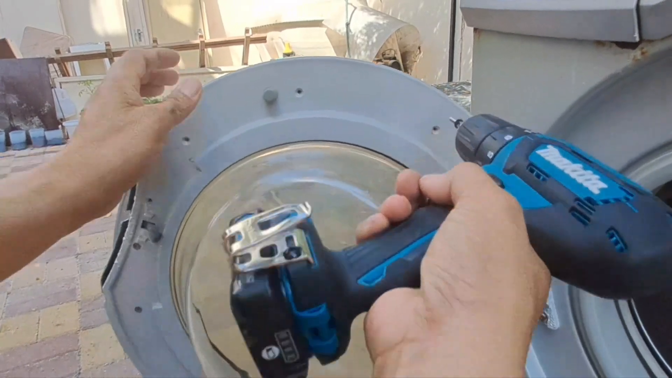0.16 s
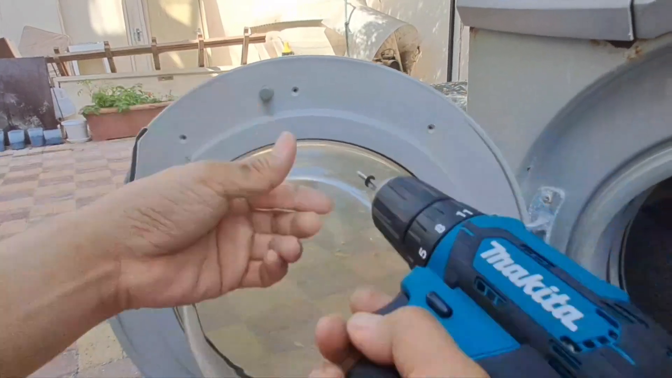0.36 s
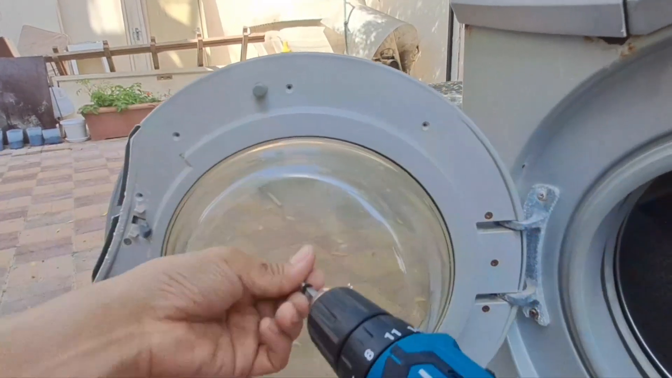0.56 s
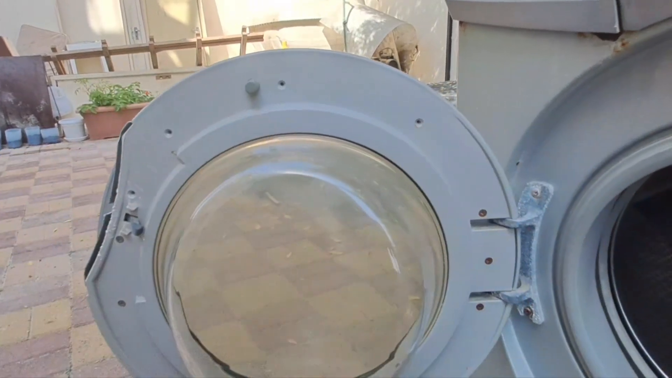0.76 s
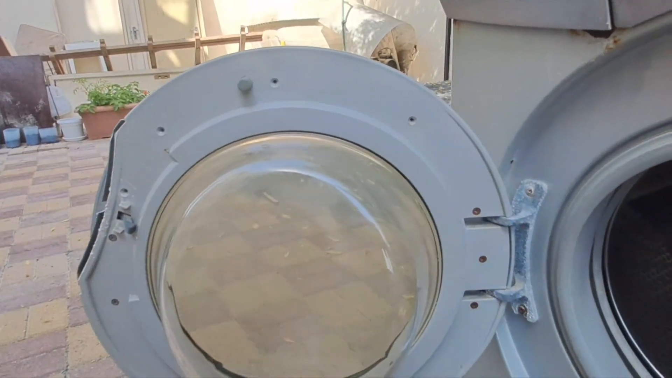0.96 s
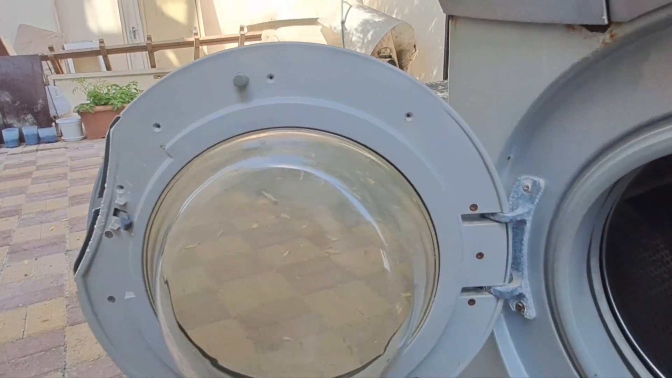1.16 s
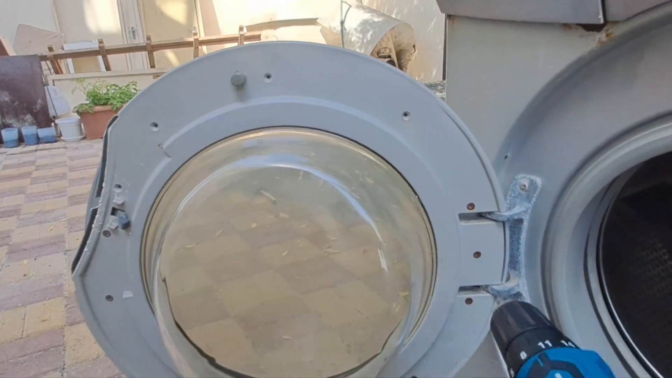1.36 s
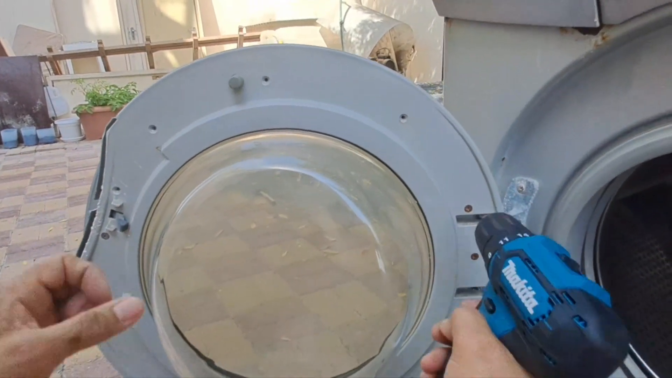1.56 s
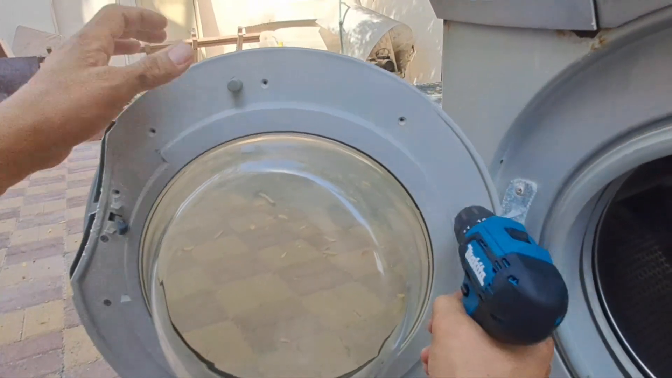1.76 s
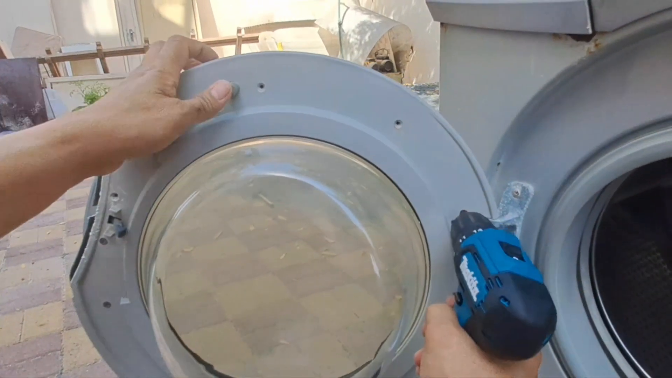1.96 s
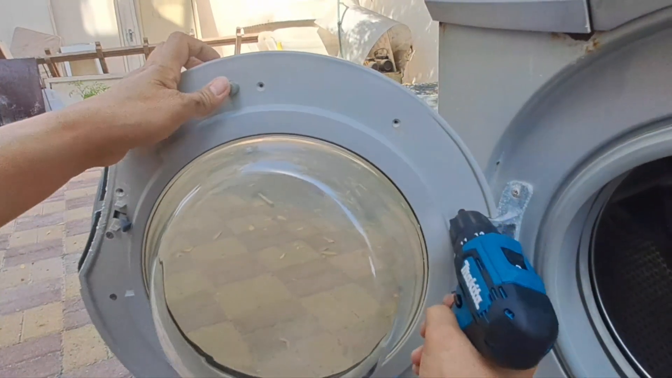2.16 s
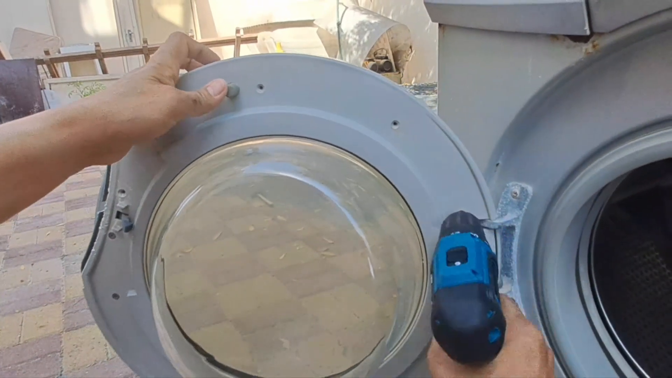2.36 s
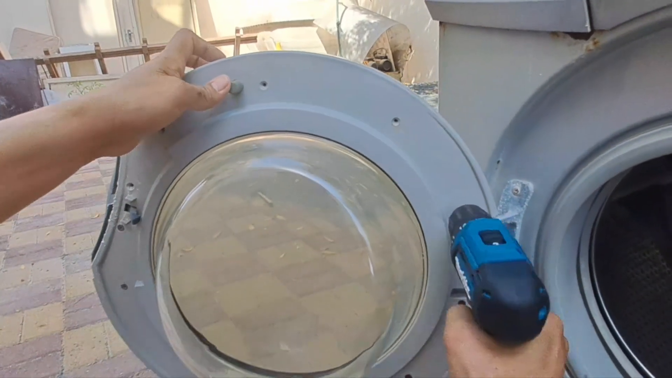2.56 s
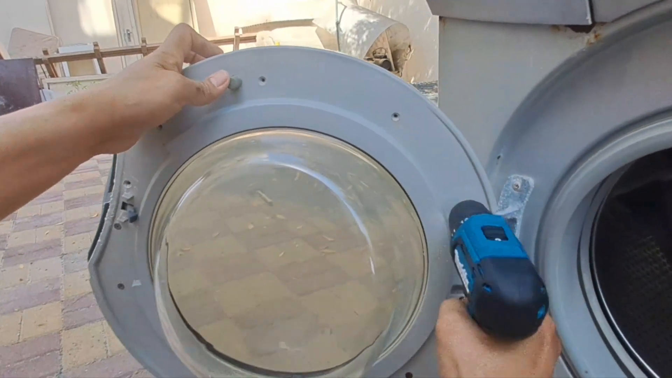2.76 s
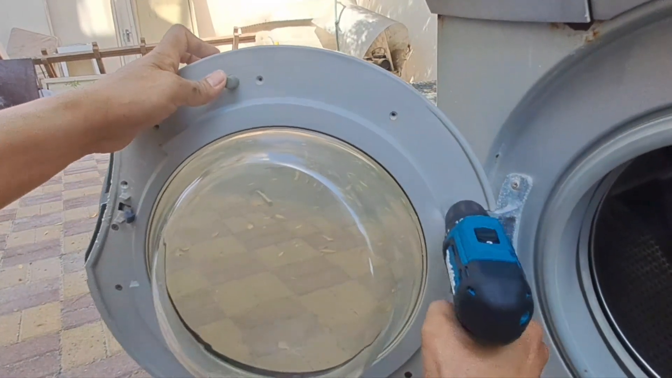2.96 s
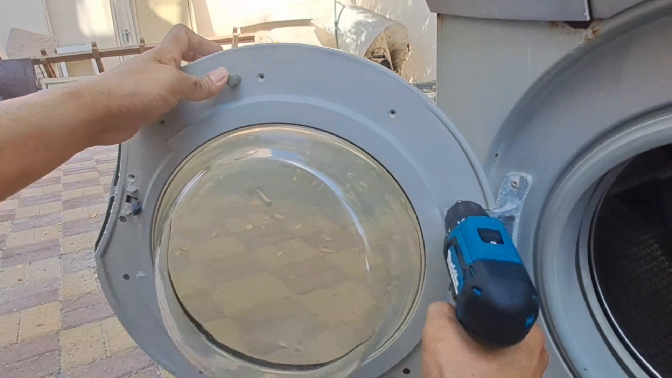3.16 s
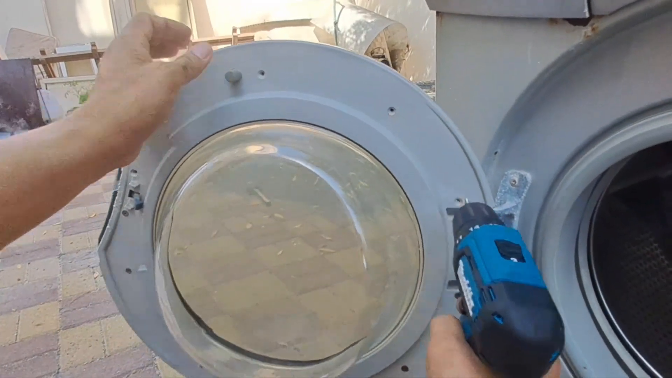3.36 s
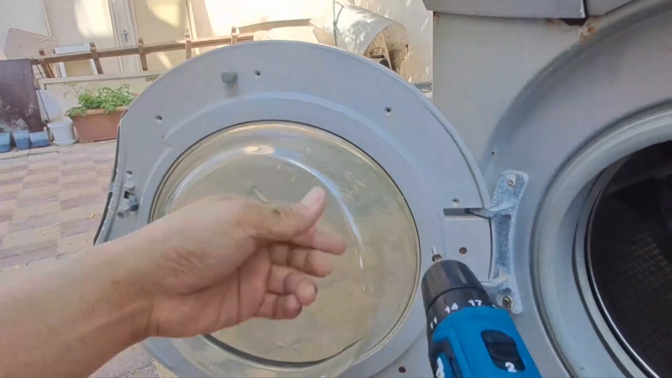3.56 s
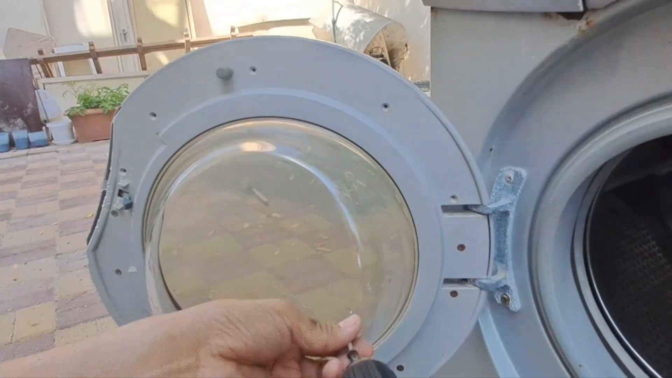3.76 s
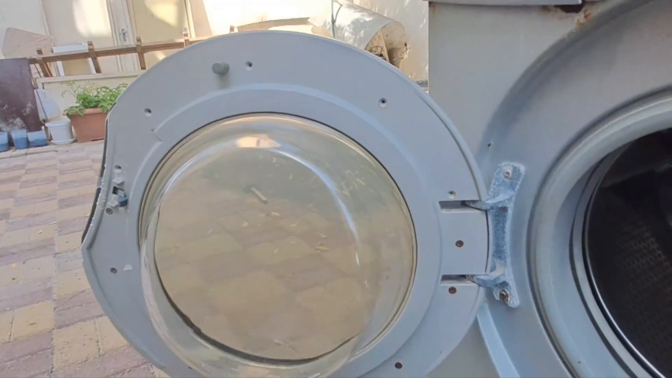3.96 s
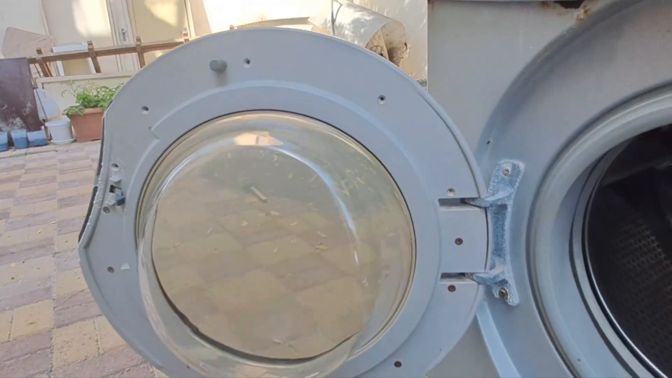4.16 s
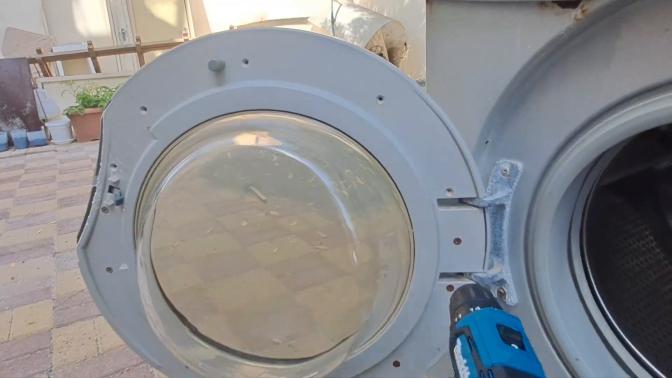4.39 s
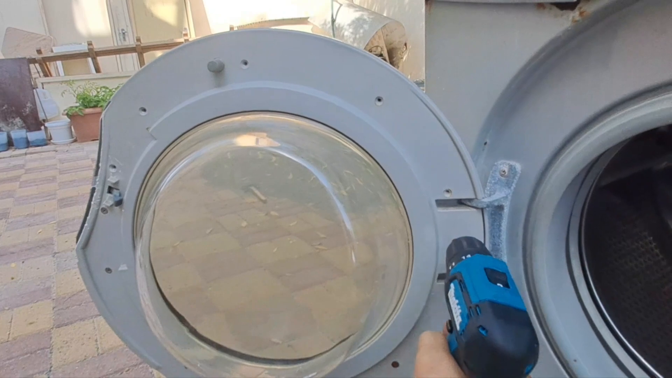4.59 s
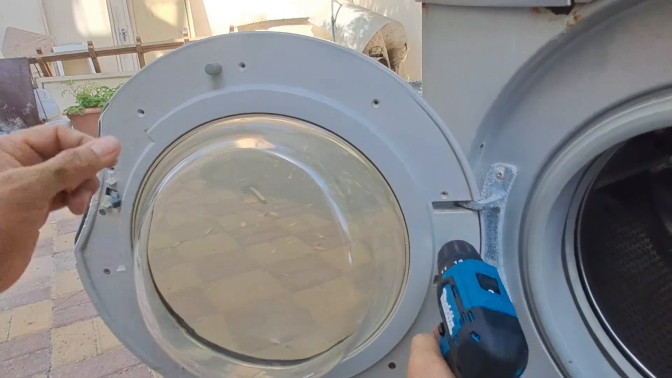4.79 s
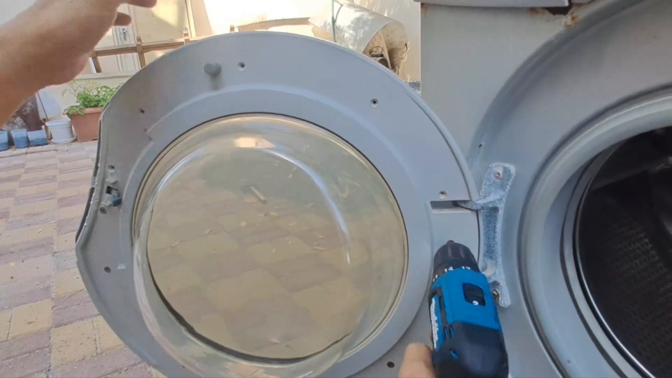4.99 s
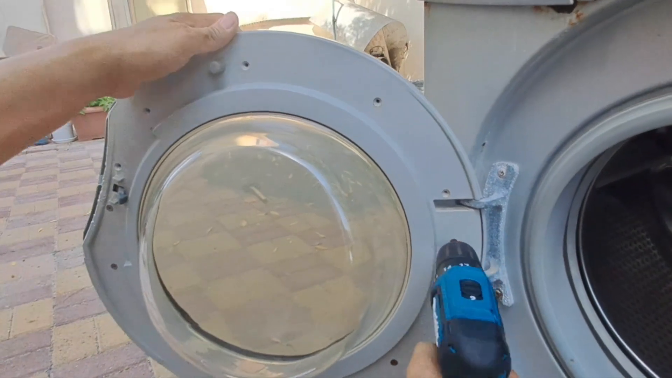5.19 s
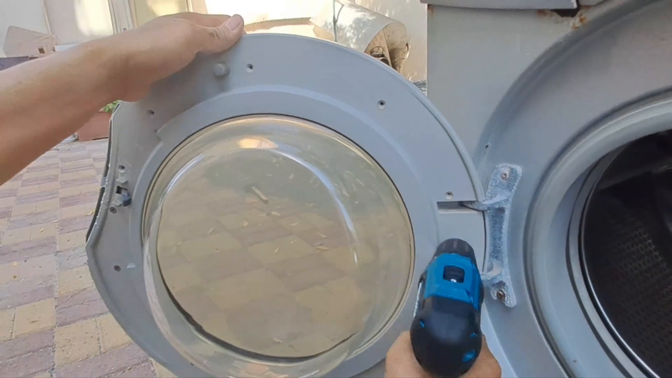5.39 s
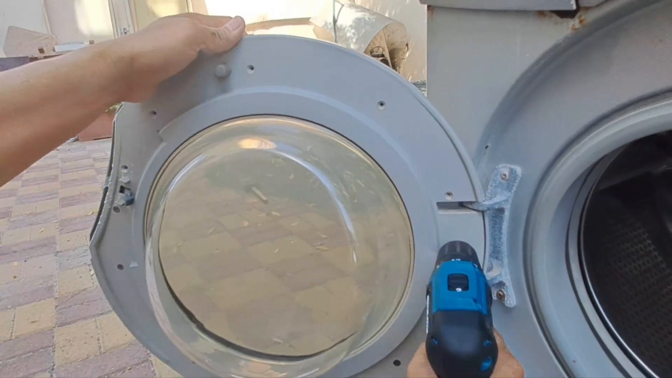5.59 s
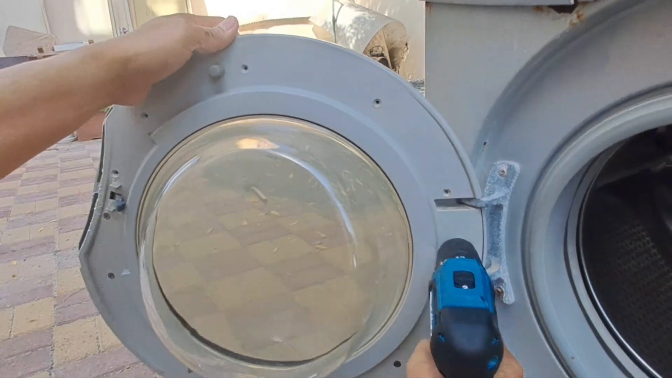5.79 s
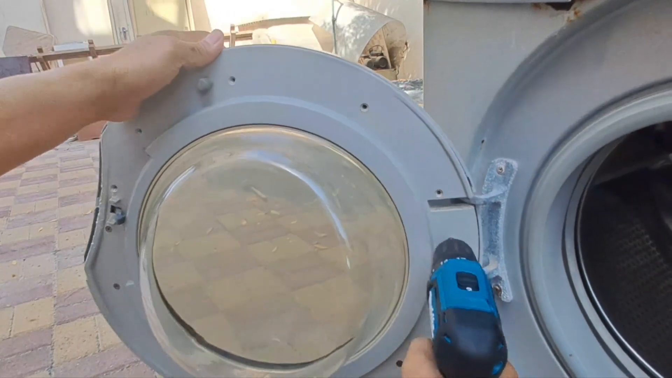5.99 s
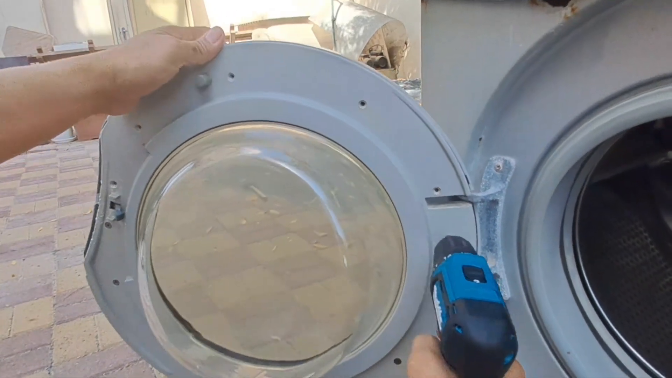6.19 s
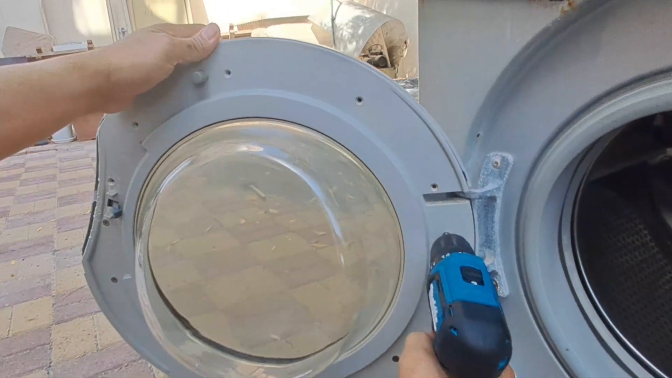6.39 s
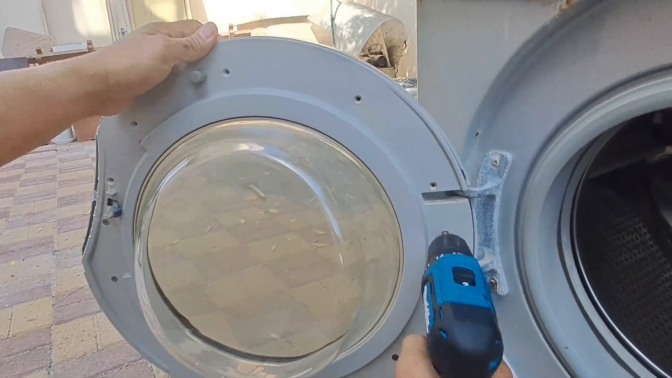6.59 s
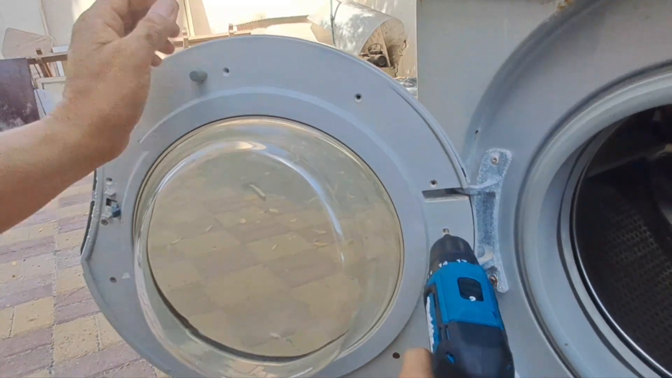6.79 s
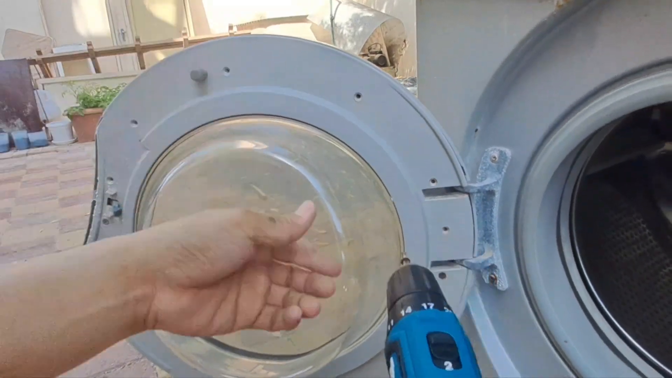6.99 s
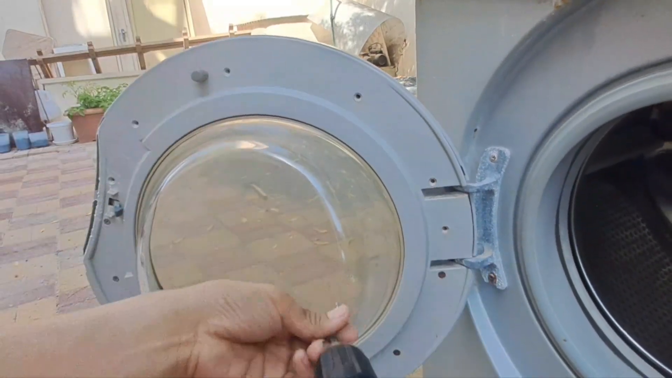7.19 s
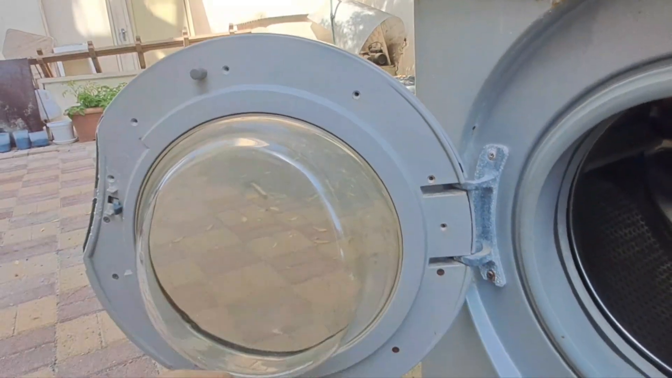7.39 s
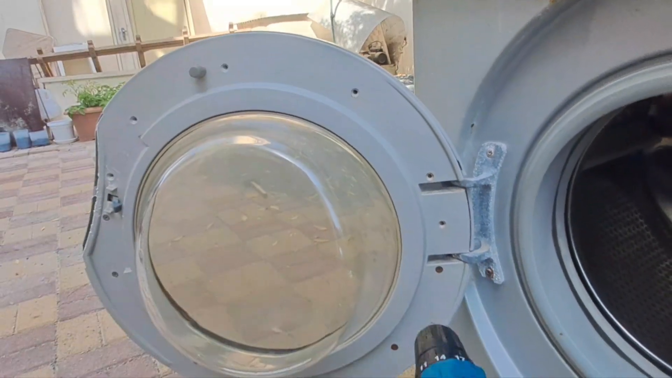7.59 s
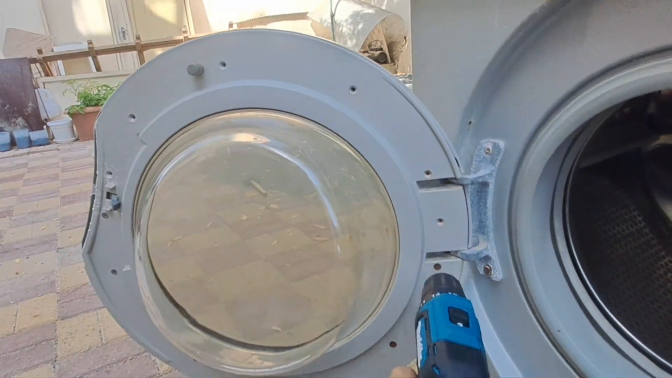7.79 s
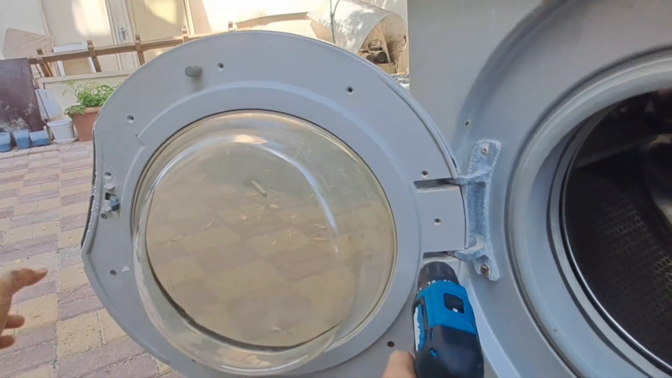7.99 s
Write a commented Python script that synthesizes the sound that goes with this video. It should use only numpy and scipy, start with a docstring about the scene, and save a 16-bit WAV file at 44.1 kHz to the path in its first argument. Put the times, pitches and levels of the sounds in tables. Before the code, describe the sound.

Short power drill pulls buzz and snap to a stop close by, between door knocks, small clicks and bird chirps in a paved yard.

```python
"""A drill's rasp ends at once in a brake clack over town rumble, street wash and high hiss.
A cordless drill whines and rasps in short pulls, with knocks and birdsong between, as it backs screws out of a
plastic appliance door in a paved yard, close to a chest-worn camera. The motor is rotor-order sines over throbbing
noise; trigger and brake clacks are short noise bursts; knocks ring decaying modes and scrape; small contacts tick.
A songbird calls in gliding sines between the walls, and a far whine falls in pitch."""
import sys
import numpy as np
from scipy import signal
from scipy.fft import rfft, irfft, next_fast_len
from scipy.io import wavfile
from scipy.ndimage import uniform_filter1d, map_coordinates

SR = 44100
rng = np.random.default_rng(int(sys.argv[2]) if len(sys.argv) > 2 else 0)


def waveform_to_disk(signal):
    """Save audio, clipped to [-1, 1], as 16-bit WAV at the path in sys.argv[1]."""
    frames = np.transpose(np.atleast_2d(signal))
    scaled = np.clip(frames, -1, 1) * 32767
    samples = np.round(scaled).astype(np.int16)
    wavfile.write(sys.argv[1], SR, samples)


N = 355005


def amp(db):
    """Gain of a level in dB."""
    return 10 ** (np.asarray(db) / 20)


def unit(x):
    """x at rms 1."""
    return x / np.sqrt(np.mean(x ** 2) + 1e-20)


def along(points, hz):
    """Reads a curve of (frequency, value) points on a log frequency axis."""
    f, v = np.transpose(points)
    return np.interp(np.log(hz + 1), np.log(f + 1), v)


def played(tables, edge):
    """One value per sample for each column, then a gate that is open while a table lasts."""
    t = np.arange(N) / SR
    s, *cols = np.transpose(np.concatenate(tables))
    gate = sum((t >= rows[0][0]) & (t < rows[-1][0]) for rows in tables)
    soft_gate = uniform_filter1d(1. * gate, int(edge * SR) + 1)
    return [np.interp(t, s, c) for c in cols] + [soft_gate]


def wobble(rate):
    """A smooth random curve, rate knots a second."""
    knots = rng.standard_normal(int(N * rate / SR) + 4)
    return map_coordinates(knots, [np.arange(N) * rate / SR])


def filtered(x, response):
    """x times a complex response of frequency."""
    m = next_fast_len(N + SR // 2)
    return irfft(rfft(x, m) * response(np.fft.rfftfreq(m, 1 / SR)), m)[..., :N]


def band(x, low_hz, high_hz):
    """Causal band-pass."""
    edges = np.clip([low_hz, high_hz], 20, .49 * SR)
    return signal.sosfilt(signal.butter(2, edges, "bandpass", fs=SR, output="sos"), x)


def sides(lean_db):
    """Left and right gains of a level difference."""
    return amp(np.array([lean_db / 2, -lean_db / 2]))


def add(track, s, sound):
    """Mixes a sound into the track at s seconds."""
    part = track[:, round(s * SR):][:, :sound.shape[1]]
    part += sound[:, :part.shape[1]]


def rush(spectrum, alike, patchy_db):
    """Stereo noise whose middle has rms 1, with patches of random gain in time and frequency."""
    z = signal.stft(rng.standard_normal((2, N)), nperseg=256)[2]
    field = uniform_filter1d(rng.standard_normal(z.shape[1:]), 2, 0)
    field = uniform_filter1d(field, 24, 1)
    pair = signal.istft(z * amp(patchy_db * unit(field)), nperseg=256)[1][:, :N]

    def mid_side(hz):
        # half the angle whose cosine is the left-right likeness
        turn = np.arccos(np.clip(along(alike, hz), -1, 1)) / 2
        return amp(along(spectrum, hz)) * [np.cos(turn), np.sin(turn)]

    mid, side = filtered(pair, mid_side)
    return np.array([mid + side, mid - side]) / np.std(mid)


# decay of the yard echo: (frequency [Hz], t60 [s])
YARD_DECAY = [(300, 0.66), (2500, 0.32), (10000, 0.31)]
ECHOES_DB = 3.5  # unevenness of the slaps off the walls


def yard(x):
    """The walls' answer: uneven slaps, each frequency dying at its own speed."""
    hz, t, z = signal.stft(rng.standard_normal((2, SR * 3 // 4)), SR, nperseg=256)
    slaps_db = ECHOES_DB * wobble(40)[(t * SR).astype(int)]
    decay_db = -60 * t / along(YARD_DECAY, hz)[:, None]
    tail = signal.istft(z * amp(slaps_db + decay_db), SR, nperseg=256)[1]
    late = np.pad(x.mean(0), (400, 0))[None]  # the walls answer 400 samples late
    return signal.fftconvolve(late, tail / np.linalg.norm(tail[0]), axes=1)[:, :N]


# town levels: (time [s], rumble level [dB], street level [dB])
TOWN_LEVELS = [(0, -42, -60), (1.1, -41.5, -59), (2.3, -35.5, -53), (3.5, -42, -57.5), (4.5, -41, -59),
               (5.5, -36, -52.5), (6.35, -43, -61.5), (8.05, -38.5, -57)]
# high hiss: (time [s], level [dB])
HISS_LEVEL = [(0, -65.5), (2.85, -62), (3.45, -81), (7.85, -81), (7.92, -63)]
# noise colours: (frequency [Hz], relative level per Hz [dB])
RUMBLE = [(25, -27.5), (50, 0), (90, 1), (118, -9), (146, -1), (170, -8.5), (400, -29), (600, -67)]
STREET = [(150, -21), (220, -11.5), (500, -13), (2500, -25.5), (3600, -29.5), (5200, -28.5), (7300, -37),
          (16000, -50)]
HISS = [(3200, -10), (4800, 7), (6000, -1), (8600, -26), (9600, -2), (11300, 1), (12500, -7),
        (16000, -31.5)]
# stereo width of the background: (frequency [Hz], left-right likeness [0-1])
FAR_LIKENESS = [(300, 1), (1000, 0.031), (10000, 0.036)]


def background():
    """Lumpy low rumble, street wash and a high hiss that comes and goes, reaching the left port first."""
    rumble_db, street_db, _ = played([TOWN_LEVELS], edge=.01)
    hiss_db = played([HISS_LEVEL], edge=.01)[0]
    rumble = amp(rumble_db + 1.5 * wobble(5)) * rush(RUMBLE, FAR_LIKENESS, patchy_db=1.2)
    street = amp(street_db) * rush(STREET, FAR_LIKENESS, patchy_db=2)
    hiss = amp(hiss_db) * rush(HISS, FAR_LIKENESS, patchy_db=.8)
    left, right = rumble + street + hiss
    return np.array([left, np.roll(right, 12)])  # delay in samples


# distant tone: (time [s], pitch [Hz], relative level [dB], blur [0-1])
FAR_WHINE = [(3.3, 1830, -61.5, 0.23), (3.75, 1762, -51.5, 1), (3.95, 1576, -59.5, 0.45),
             (4.5, 1434, -54.5, 0.03), (5.1, 1382, -56, 0.77)]


def far_whine():
    """A distant tone with a weak lower octave, its pitch blurred by the air, heard off the walls."""
    hz, db, blur, on = played([FAR_WHINE], edge=0.288)
    blurred_hz = hz * (1 + 0.0354 * blur * wobble(130))
    phase = 2 * np.pi * np.cumsum(blurred_hz) / SR
    octaves = np.sin(phase) + amp(-10.0) * np.sin(phase / 2)
    tone = on * amp(db + 2.5 * wobble(20)) * octaves
    return yard(tone[None])


NOTE_ATTACK_S, NOTE_FADE_DB_PER_S = .004, 100  # the attack time also shapes the end of a note


def whistle(notes, rough):
    """Each note slides from its first pitch to a settled one and fades; the pitch is slightly unsteady."""
    out, t = np.zeros((1, N)), np.arange(SR // 8) / SR
    unsteady = 1 + rough * wobble(200)
    for s, length, first_hz, settled_hz, glide, db in notes:
        slide_hz = settled_hz + (first_hz - settled_hz) * np.exp(-t / glide)
        hz = slide_hz * unsteady[round(s * SR):][:len(t)]
        phase = 2 * np.pi * np.cumsum(hz) / SR
        edges = np.clip(np.minimum(t, length - t) / NOTE_ATTACK_S, 0, 1)
        shape = edges * amp(db - NOTE_FADE_DB_PER_S * t)
        add(out, s, (shape * np.sin(phase))[None])
    return out


# notes of the near singer, then of farther birds:
# (time [s], length [s], first pitch [Hz], settled pitch [Hz], glide [s], relative level [dB])
SONG = [(4.693, .02, 2760, 2640, .006, -38), (4.712, .062, 2700, 3160, .008, -28),
        (4.899, .046, 2640, 2595, .02, -20), (4.976, .055, 3250, 2995, .004, -24),
        (5.046, .044, 3020, 2630, .007, -20), (5.148, .022, 2886, 2790, .01, -20),
        (5.166, .05, 2850, 2130, .014, -19), (5.256, .05, 3120, 2378, .004, -20)]
FAR_SONG = [(3.545, 0.021, 6940, 4460, 0.019, -56), (3.587, 0.019, 4640, 6000, 0.0136, -55),
            (7.41, 0.047, 2600, 2490, 0.0095, -66), (7.555, 0.065, 2780, 2744, .01, -60),
            (7.7, 0.05, 2520, 2324, 0.0034, -56.5), (7.826, 0.12, 2900, 2730, 0.01, -61)]


def birds():
    """The singer comes direct and off the walls, the far birds mostly off the walls; a faint hiss at
    9.5-13.5 kHz follows the singer's notes."""
    near, far = whistle(SONG, rough=.01), whistle(FAR_SONG, rough=.006)
    note_hiss = band(np.abs(near) * rng.standard_normal(N), low_hz=9500, high_hz=13500)
    note_hiss = amp(-22) * note_hiss
    near = near * (1 + .25 * wobble(500))  # husky
    direct = amp(2.5 * wobble(70)) * near
    echo = yard(amp(-3.5) * near + note_hiss + 2 * far)
    return direct + echo + note_hiss + far / 2


# small handling contacts: (time [s], relative peak level [dB], centre [Hz])
TICKS = [(1.0173, -41.5, 5050), (1.5076, -32, 11100), (2.461, -35, 3500), (2.483, -33.5, 4970),
         (2.806, -36.5, 8900), (2.867, -22.5, 11020), (4.108, -42, 2210), (4.1298, -38, 5240),
         (4.6256, -35, 8000), (5.1509, -23, 4640), (5.2, -32.5, 5400), (5.396, -47, 10900),
         (5.641, -44, 7000), (5.7579, -43, 8890), (5.7845, -37, 12000), (7.892, -38, 11000),
         (8.016, -43.5, 12000)]


def ticks():
    """Hard little contacts of bit, screw and fingers: band-passed noise with a fast and a faint slower decay."""
    out, t = np.zeros((2, N)), np.arange(SR // 30) / SR
    for s, db, centre_hz in TICKS:
        decay = amp(-60 * t / 0.027) + 0.032 * amp(-60 * t / 0.098)
        snap = decay * rng.standard_normal((2, len(t)))
        snap = band(snap, centre_hz * 0.25, centre_hz * 1.22)
        add(out, s, amp(db + 5.0) * snap / np.abs(snap).max())
    return out


def ring(modes, scale, rise, t):
    """Decaying sines of a struck body, each mode at a slightly new strength per blow."""
    total = 0
    for hz, db, t60 in modes:
        level_db = db + rng.normal(0, 1.2) - 60 * t / t60
        total = total + amp(level_db) * np.sin(2 * np.pi * hz * scale * t)
    return (1 - np.exp(-t / rise)) * total


# the bit hits the door: (time [s], relative level [dB], boom over that level [dB], rim pitch at that spot [Hz])
KNOCKS = [(2.015, -17, -3.5, 463), (2.162, -25, -6, 500), (2.19, -24, -4.5, 500), (2.469, -25.5, 5, 511),
          (4.824, -31.5, 10, 685), (4.882, -28, 1, 466), (5.149, -16, 3.5, 669), (5.825, -31, -28, 612),
          (5.993, -11, -10.5, 484), (6.644, -38.5, 1, 576), (7.005, -39, -15.5, 585)]
# plastic rim modes: (multiple of the spot's pitch, relative level [dB], t60 [s])
RIM = [(1, 5, 0.03), (1.5, -6, 0.03)]
# glass bowl modes: (frequency [Hz], relative level [dB], t60 [s])
BOWL = [(88.7, -2, 0.28), (144, -7.5, 0.15), (180, -4, 0.13)]


def knocks():
    """Each blow rings the plastic rim and glass bowl; the bit scrapes on, with a louder tail the more it booms."""
    out, t = np.zeros((2, N)), np.arange(SR // 4) / SR
    uneven = wobble(60)
    for s, db, boom_db, spot_hz in KNOCKS:
        rattle = rng.standard_normal(len(t)) + .5 * rng.standard_normal((2, len(t)))
        tail_db = boom_db / 2 - 7.5 - 60 * t / 0.2 + 1.6 * uneven[round(s * SR):][:len(t)]
        grip = (1 - np.exp(-t / 0.0057)) * (amp(-60 * t / 0.038) + amp(tail_db))
        scrape = band(grip * rattle, spot_hz * 0.25, spot_hz * 1.29)
        scrape = band(scrape, low_hz=199, high_hz=2570)
        scrape = scrape + amp(-30.5) * band(grip * rattle, low_hz=1030, high_hz=6000)
        rim = ring(RIM, spot_hz, 0.0019, t) * sides(6.2)[:, None]
        bowl = ring(BOWL, 1, 0.015, t)
        add(out, s, amp(db) * (amp(3.5) * rim + amp(boom_db + 4) * bowl + amp(15.5) * scrape))
    return out


# drill shell resonances: (frequency [Hz], width [Hz], relative level [dB])
HOUSING = [(3730, 420, -5), (5685, 480, -5), (7560, 230, -8.5), (10170, 370, -14)]


def shell(hz):
    """The drill housing passes everything and lifts its resonances."""
    return 1.034 + sum(amp(db) * 1j * hz * w / (c * c - hz * hz + 1j * hz * w) for c, w, db in HOUSING)


# the spindle brake ends each pull: (time [s], relative level [dB], part under 2 kHz over that level [dB],
# length scale [s], gap to its second clack [s])
BRAKES = [(0.0147, 0, -12, 0.014, 0.024), (3.289, -1, -14.5, 0.017, 0.023), (6.1976, 0, -12, 0.013, .021),
          (7.0223, -20, -9, 0.015, 0.019)]
BITE_S = .005  # from pull to the clack of the gears taking up
TRIGGER_LOW_DB, TRIGGER_S = -26.5, .006  # trigger clack: part under 2 kHz over its level, length scale
REBOUND_DB = -5  # the brake's second clack over its first


def clacks():
    """A few milliseconds of rattling contact; its upper part rings the drill shell."""
    high, low = np.zeros((2, N)), np.zeros((2, N))
    t = np.arange(SR // 20) / SR
    triggers = [(pull[0] + BITE_S, pull[-1], TRIGGER_LOW_DB, TRIGGER_S) for pull in PULLS if pull[0] > 0]
    rebounds = [(s + gap, db + REBOUND_DB, low_db, length / 2) for s, db, low_db, length, gap in BRAKES]
    for s, db, low_db, length, *_ in triggers + BRAKES + rebounds:
        fall = np.exp(-(t / np.clip(length * 0.59, .001, .03)) ** 2)
        shape = (1 - np.exp(-t / 0.0009)) * fall
        add(high, s, amp(db - 10.0) * shape * rng.standard_normal((2, len(t))))
        rattle = rng.standard_normal(len(t)) + 2.3 * rng.standard_normal((2, len(t)))
        add(low, s, amp(db + low_db + 0.5) * shape * rattle)
    ringing = band(filtered(high, shell), low_hz=3000, high_hz=13000)
    return ringing + band(low, low_hz=940, high_hz=1900)


# trigger pulls: (pulled [s], released [s], whine pitch approached [Hz], spin-up [s], coast [Hz per s],
# gear tone over rasp [dB], relative rasp level [dB], relative door drumming level [dB],
# tightness of the screw [0-1], first lurch over drumming [dB], relative trigger clack level [dB])
PULLS = [(-.4, -0.127, 4500, 0.082, 15600, -19, -29, -30.5, 0.04, -9.5, -40),
         (2.869, 3.205, 4518, 0.049, 6870, -30, -28, -38.5, 0.65, 14.5, -13.5),
         (5.83, 6.13, 4463, 0.059, 11700, -42.5, -30, -35.5, 0.55, -13, 0.5),
         (6.482, 6.632, 2890, 0.065, 3852, -1, -37.5, -53, 0, 8.5, -45)]
WHINE_DB, RASP_GROWS = 6, 0.82  # whine setting over rasp; power of the speed that the gains follow
FREES_S, LURCH_S = .15, .06  # a tight screw lets go; at first it lurches and drums the door harder
DRAG_DB_PER_S = 90  # extra fade of the tones when coasting in a fully tight screw
BRAKED_DB, RUNDOWN_DB_PER_S = -5, 520  # gear noise under the brake; its fade after the second clack
SETTLES = .15  # share of the spin-up over which the tones appear, later for a tighter screw


def speed():
    """Whine pitch and four gains: the rotor nears top speed, coasts down evenly, and the brake ends its tones."""
    t = np.arange(N) / SR
    out = np.zeros((5, N))
    for pull, (braked, *_, gap) in zip(PULLS, BRAKES):
        pulled, released, top_hz, spin_up, coast, gear_db, rasp_db, drum_db, tight, lurch_db, _ = pull
        now = t >= pulled
        u = t[now]
        since = u - pulled
        coasting = np.maximum(u - released, 0)
        rise = 1 - np.exp(-(np.minimum(u, released) - pulled) / spin_up)
        slowed_hz = coast * np.maximum(np.minimum(u, braked) - released, 0)
        pitch = np.maximum(top_hz * rise - slowed_hz, 0)
        effort = (pitch / top_hz) ** RASP_GROWS
        strain = np.clip(tight, 0, 1) * np.exp(-since / FREES_S) * (since > BITE_S)
        dying = amp(BRAKED_DB * (u > braked) - RUNDOWN_DB_PER_S * np.maximum(u - braked - gap, 0))
        appear = np.clip((rise - np.sqrt(abs(tight))) / SETTLES + 1, 0, 1)
        drag = amp(-DRAG_DB_PER_S * tight * coasting)
        out[0, now] = pitch
        out[1:3, now] = amp([[WHINE_DB], [gear_db]]) * appear * effort * (u < braked) * drag
        out[3, now] = amp(rasp_db) * (effort + strain) * dying
        out[4, now] = amp(drum_db) * (1 + amp(lurch_db) * np.exp(-since / LURCH_S)) * dying
    return uniform_filter1d(out[0], SR // 40), *uniform_filter1d(out[1:], SR // 400)


# rotor tones: (multiple of rotor speed, level over whine [dB])
ROTOR = [(1, -19), (4, -15), (6, -16), (24, -11)]
# noise colours of gears and door: (frequency [Hz], relative level per Hz [dB])
RASP = [(600, -24), (1300, -3), (2500, -5.5), (5500, -0.5), (10000, -6.5), (16000, -15)]
DRUM = [(150, -17.5), (300, 2), (600, 2.5), (2000, -9.5), (3200, -30.5)]
# stereo width of the near noise: (frequency [Hz], left-right likeness [0-1])
NEAR_LIKENESS = [(100, 1), (600, 0.81), (1500, 0.26), (7000, 0.05)]
SLOTS = 12  # the whine is this multiple of the rotor speed


def motor():
    """Rotor orders over unevenly throbbing gear rasp; the screw drums the door."""
    whine_hz, whine_gain, gear_gain, rasp_gain, drum_gain = speed()
    turns = np.cumsum(whine_hz / SLOTS * (1 + .003 * wobble(70))) / SR

    def tone(k, flutter_db):
        phase = 2 * np.pi * k * turns + np.array([[0], [0.41 * k]])  # left, right
        return amp(flutter_db * wobble(45)) * np.sin(phase)

    whine = whine_gain * tone(SLOTS, flutter_db=3.5)
    gear = gear_gain * tone(4.85, flutter_db=2.2)
    order_gain = whine_gain * np.clip(whine_hz / 4000, 0, 1) ** 2  # weaker at low speed
    orders = order_gain * sum(amp(db) * tone(k, flutter_db=5.0) for k, db in ROTOR)
    throb = amp(.8 * wobble(45) + 1.3 * wobble(440))
    rasp = amp(3.0) * throb * filtered(rush(RASP, NEAR_LIKENESS, patchy_db=2.5), shell)
    drum = amp(1.5 * wobble(53)) * rush(DRUM, NEAR_LIKENESS, patchy_db=5.0)
    return rasp_gain * (whine + gear + orders + rasp) + drum_gain * drum


# the work sits mostly to the left: (frequency [Hz], left over right [dB])
WORK_LEAN = [(1300, 1), (2700, 10.5), (9000, -0.5), (14000, 13)]


def scene():
    """Work close by with a little yard echo, over birds and town."""
    work = motor() + clacks() + ticks() + knocks()
    work = filtered(work, lambda hz: sides(along(WORK_LEAN, hz)))
    return work + amp(-15.5) * yard(work) + birds() + far_whine() + background()


# microphone ports: (frequency [Hz], left over right [dB])
PORTS = [(300, 2), (4400, -8), (8000, 1.5), (14000, -4)]
TOP_HZ = 15950  # band limit


def record(dry):
    """Two unlike microphone ports, a softly saturating input, and nothing above the band limit."""
    ports = filtered(dry, lambda hz: sides(along(PORTS, hz)))
    held = ports / (1 + np.abs(ports / .9) ** 4) ** .25
    return filtered(held, lambda hz: np.clip((TOP_HZ - hz) / 300, 0, 1) ** 2)


dry = scene()
out = record(dry)
waveform_to_disk(out)
```